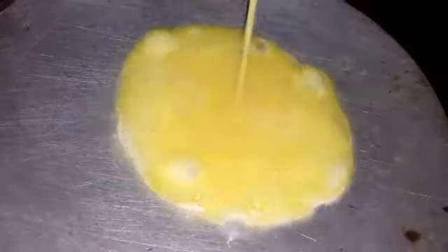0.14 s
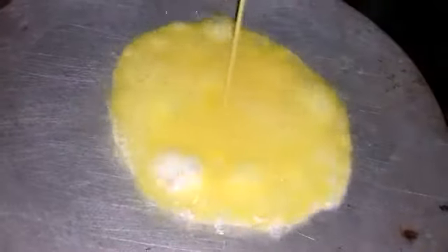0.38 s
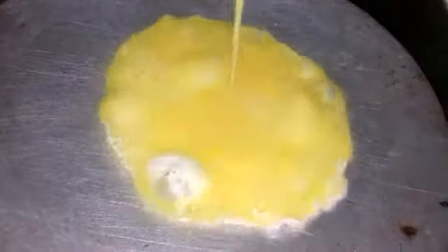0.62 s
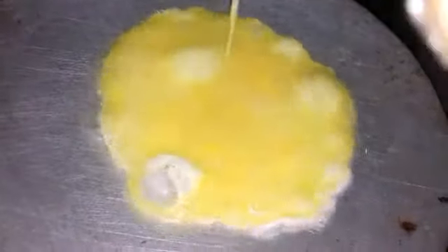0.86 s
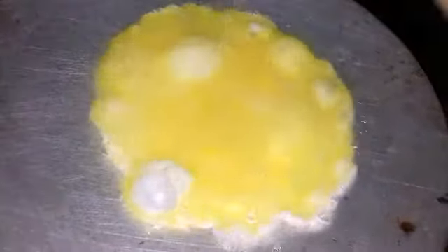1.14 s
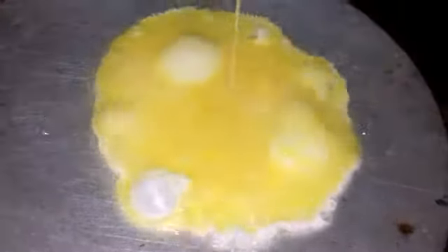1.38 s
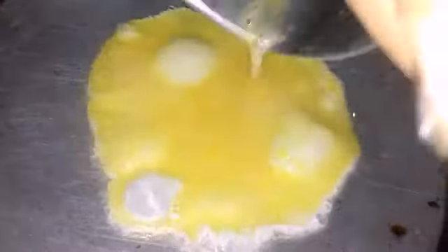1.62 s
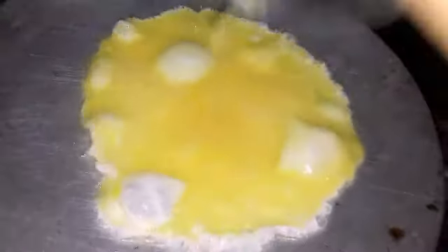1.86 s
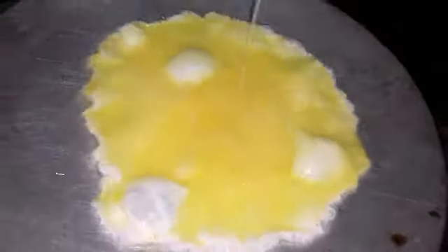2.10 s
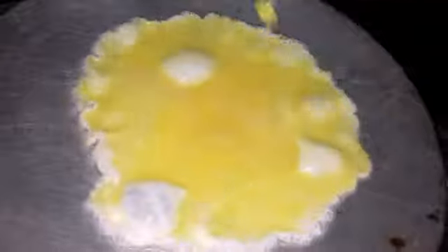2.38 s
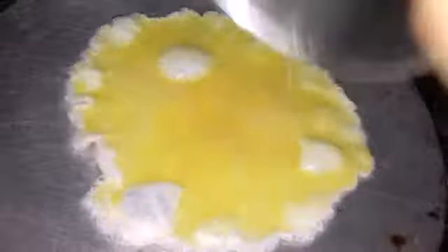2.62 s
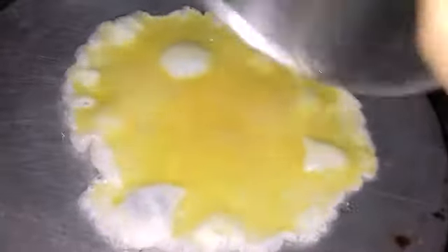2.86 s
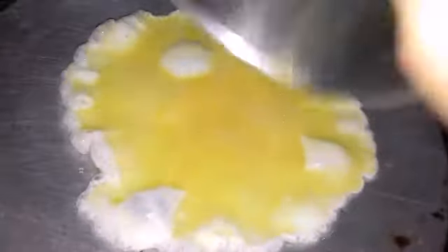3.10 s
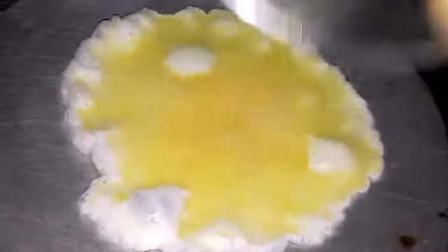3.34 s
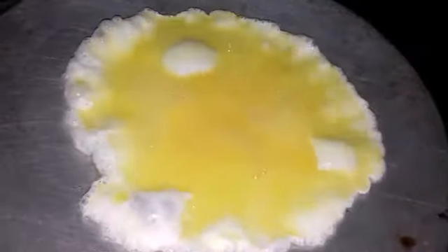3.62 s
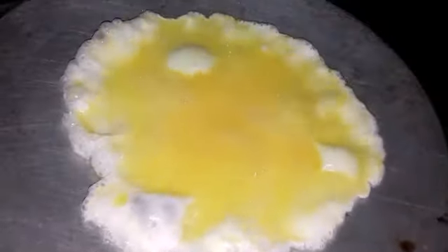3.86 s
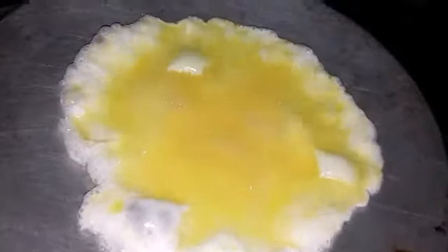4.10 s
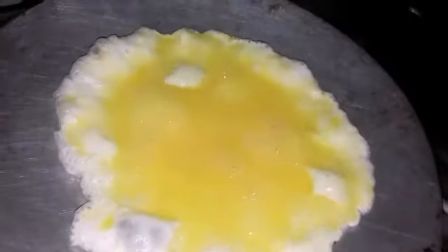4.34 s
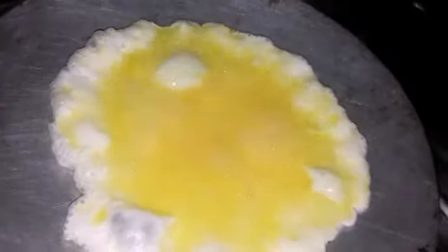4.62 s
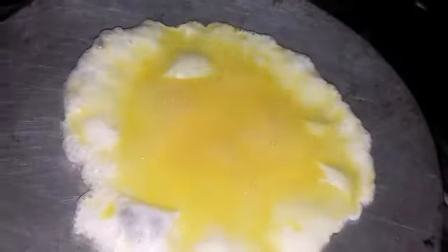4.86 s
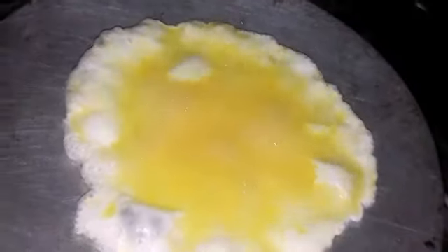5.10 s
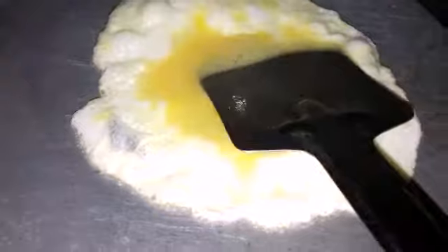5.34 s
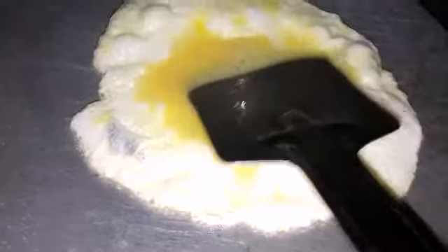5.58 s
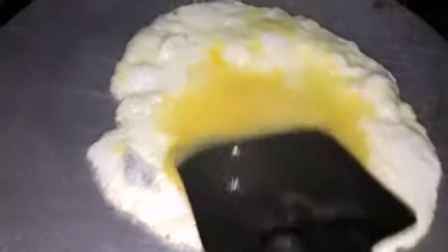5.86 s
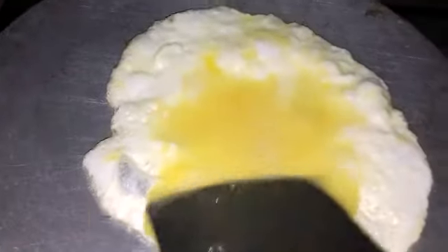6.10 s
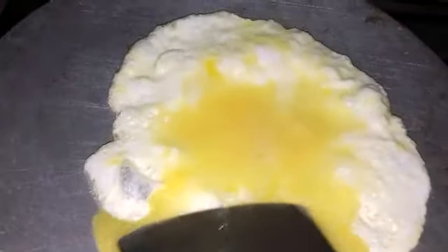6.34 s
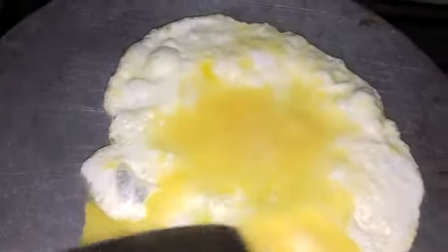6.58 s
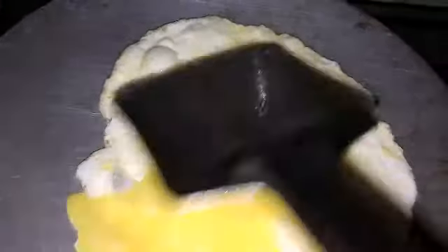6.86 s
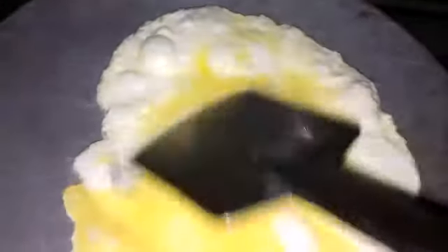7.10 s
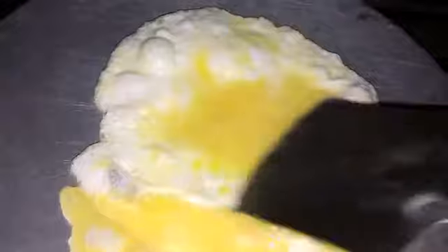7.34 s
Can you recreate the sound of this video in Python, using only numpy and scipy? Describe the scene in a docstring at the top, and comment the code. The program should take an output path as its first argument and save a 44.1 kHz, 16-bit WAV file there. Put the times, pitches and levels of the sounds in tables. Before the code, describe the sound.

Beaten egg sizzles and spits sharply on a hot metal griddle, dies to a faint crackle, then flares brightly as a spatula spreads it.

```python
"""Egg frying on a hot griddle

Beaten egg fries close by on hot oiled metal, with its fizz strongest at 3.5-5 kHz.
Steam bursts are dense random clicks, bubbles are short sines, and fat spits are rings with snaps and puffs.
The sizzle dies down, then flares at about 6 s when a spatula spreads raw egg on bare metal.
Dull knocks and tings come now and then. Filtered noise makes a faint kitchen hum, and a faint
noise that is opposite in the two channels and partly follows the fizz level.
"""
import sys
import numpy as np
from scipy import signal
from scipy.io import wavfile
from scipy.ndimage import uniform_filter1d

SR = 44100
rng = np.random.default_rng(int(sys.argv[2]) if len(sys.argv) > 2 else 0)


def wav_record(signal):
    """Record a signal, one row per channel, as 16-bit PCM in the file named by sys.argv[1]."""
    frames = np.transpose(np.atleast_2d(signal))
    bounded = np.clip(frames, -1, 1)
    # unit amplitude maps onto the largest positive 16-bit level
    quanta = np.round(bounded * 32767).astype(np.int16)
    wavfile.write(sys.argv[1], SR, quanta)


def boost(x):
    """Linear amplitude factor 10**(x/20) for a level x in decibels (scalar or array-like)."""
    u = np.asarray(x, float) / 20
    return 10 ** u


N = 328920  # length in samples


def evened(x):
    """Scales a sound to an rms of 1."""
    return x / np.sqrt(np.mean(x ** 2) + 1e-20)


def averaged_twice(x, size):
    """Smooths with two running means of size samples, leaving only slow changes."""
    return uniform_filter1d(uniform_filter1d(x, size), size)


def between(span, share):
    """Picks a value inside a range; share runs from 0 to 1."""
    return span[0] + (span[1] - span[0]) * share


def level(curve, column=1):
    """Draws straight lines between the points of a curve, one value per sample."""
    rows = np.array(curve)
    return np.interp(np.arange(N) / SR, rows[:, 0], rows[:, column])


def read(points, hz):
    """Reads a spectrum along a logarithmic frequency axis."""
    f, value = np.transpose(points)
    return np.interp(np.log(hz + 1), np.log(f + 1), value)


def causal(points, size=1024):
    """Turns a spectrum into its minimum-phase click, with the energy as early as possible."""
    hz = abs(np.fft.fftfreq(8 * size, 1 / SR))
    log_gain = np.log(boost(np.maximum(read(points, hz), -100)))
    return np.fft.ifft(np.exp(np.conj(signal.hilbert(log_gain)))).real[:size]


def band(x, low_hz, high_hz, order=2):
    """Keeps the frequencies between two limits with a Butterworth band-pass."""
    return signal.sosfilt(signal.butter(order, [low_hz, high_hz], "bandpass", fs=SR, output="sos"), x)


def add(mix, s, sound):
    """Mixes a sound in at s seconds."""
    part = mix[round(s * SR):][:len(sound)]
    part += sound[:len(part)]


def patchy_noise(points, patchy_db):
    """Noise of a given spectrum whose level drifts in patches of time and frequency."""
    a, b, patches = rng.standard_normal((N // 256 + 5, 513, 3)).T
    patches = uniform_filter1d(patches, size=10, axis=0)
    patches = evened(uniform_filter1d(patches, size=10, axis=1))
    colour_db = read(points, np.fft.rfftfreq(1024, 1 / SR))[:, None]
    z = (a + 1j * b) * boost(colour_db + patchy_db * patches)
    return evened(signal.istft(z, nperseg=1024, noverlap=768)[1][:N])


def clicks(per_s, spread_db, clump_db):
    """Random clicks, a few of them large, in clumps some 20 ms long."""
    happens = rng.random(N) < per_s / SR
    size = np.minimum(rng.exponential(1, N), 4.5)
    sign = rng.choice([-1., 1.], N)
    clump = evened(uniform_filter1d(rng.standard_normal(N), size=800))
    return sign * happens * boost(spread_db * size + clump_db * clump)


def ring(hz, cycles, rise=0.):
    """A sine that swells in under a cycle, then dies by 1/e in so many cycles while its pitch may rise."""
    turns = np.arange(round(6 * cycles * SR / hz)) * hz / SR
    envelope = (1 - np.exp(-turns / 0.19)) * np.exp(-turns / cycles)
    return envelope * np.sin(2 * np.pi * turns * (1 + rise * turns))


def whistle(t, db, hz, size):
    """A fuzzy tone: slow noise, averaged over size samples, riding on a pitch."""
    a = averaged_twice(rng.standard_normal(len(t)), size)
    b = averaged_twice(rng.standard_normal(len(t)), size)
    carrier = np.exp(2j * np.pi * np.cumsum(hz + 0 * t) / SR)
    return boost(db) * evened(((a + 1j * b) * carrier).real)


# colour of the kitchen hum: hz, level_db (per Hz)
HUM_COLOUR = [(15, -35), (30, 2), (60, -13.5), (80, -5.5), (100, 4.5), (150, 1.5), (190, -7.5), (221, 5),
              (290, -6), (351, 4.5), (430, -1.5), (700, -4), (1400, -32), (4250, -12), (5700, -39),
              (9500, -38), (13000, -49), (16000, -56)]


def hum():
    """Faint kitchen hum: noise that is strongest in the lows."""
    return boost(-59.5) * patchy_noise(HUM_COLOUR, 1.4)


# brief changes of the fizz, each fading back:
# start_s, rise_db (nominal; below 0 is a dip), t60_s (time for the change to fade by 60 dB)
FIZZ_SURGES = [(.245, -11, 0.4), (.32, -3.5, 0.28), (.975, 3, 0.39), (1.325, 3.5, 0.18), (1.57, -1, 0.24),
               (2.005, 0, .4), (2.22, 5.5, 0.69), (2.345, 2, 0.49), (2.54, 2.5, 1), (2.72, 2.5, 0.98),
               (3.405, 7, 0.47), (3.74, 5, 0.17), (3.89, 6.5, 0.38), (4.896, 11, 0.23), (5.15, 9, 0.98),
               (5.397, 12.5, 0.37), (5.667, 14, .4)]


def surge_db():
    """Gain of the fizz as it surges or dips briefly and settles back."""
    surplus, t = np.zeros(N), np.arange(SR) / SR
    for s, db, t60 in FIZZ_SURGES:
        onset = 1 - np.exp(-t / 0.0056)
        add(surplus, s, (boost(db) - 1) * onset * boost(-60 * t / t60))
    return 20 * np.log10(np.maximum(1 + surplus, .1))


# how hard the egg fries, before the surges and the plate: time_s, fizz_db, bubbles_db
FRYING = [(0, -35, -39.5), (.31, -31, -41.5), (.46, -39.5, -40.5), (1.04, -43, -41), (1.5, -40, -41),
          (2.1, -41.5, -43), (2.8, -43.5, -46), (3.3, -45, -46.5), (3.7, -50, -49.5), (4.0, -47.5, -48),
          (4.7, -53.5, -49.5), (5.1, -50, -51.5), (5.3, -56, -54), (5.34, -61.5, -59), (5.65, -66, -61.5),
          (5.995, -60.5, -56), (6.022, -42.5, -48), (6.05, -43, -50), (6.09, -37, -42.5), (6.13, -36, -42),
          (6.175, -38.5, -43), (6.215, -35.5, -43.5), (6.29, -35.5, -45.5), (6.36, -39, -46),
          (6.4, -38.5, -47), (6.5, -35, -44), (6.57, -39, -47.5), (6.6, -38.5, -45.5), (6.79, -47.5, -49.5),
          (6.85, -42, -48.5), (6.95, -42.5, -50.5), (7.02, -52, -48.5), (7.05, -52, -52.5),
          (7.15, -54.5, -49.5), (7.46, -52, -53)]


def fizz_level():
    """Level of the steam fizz over time in dB, with its surges."""
    return level(FRYING) + surge_db()


def bubble_level():
    """Level of the bubbling over time in dB, from which each kind of bubble is set."""
    return level(FRYING, column=2)


# colour of the faint noise that is opposite in the two channels: hz, level_db (per Hz)
OPPOSITE_COLOUR = [(15, -36), (25, -3), (476, 1), (754, 0), (962, 0), (2840, -2.5), (5000, -3), (9840, -4),
                   (12000, -3), (14400, -5), (16000, -23)]


def opposite_noise():
    """Faint patchy noise that follows 0.32 of the fizz swing: -61 dB when the fizz is at -44.5 dB."""
    return boost(-61 + 0.32 * (fizz_level() + 44.5)) * patchy_noise(OPPOSITE_COLOUR, 2.1)


def kitchen(x):
    """Adds a thin echo off the nearest wall and a short sparse tail of random reflections."""
    taps = np.zeros(8000)
    at = np.arange(200, 7980, 20) + rng.integers(0, 20, 389)
    taps[at] = rng.choice([-1., 1.], len(at)) * boost(-60 * at / SR / 0.32)  # falls 60 dB in 0.32 s
    taps *= boost(-6.5) / np.linalg.norm(taps)
    taps[0] += 1  # the direct sound
    add(taps, .0103, boost(-6) * band(signal.unit_impulse(200), 3000, 7000))
    return signal.oaconvolve(x, taps)[:N]


# what the knocks ring with: pitch_hz, level_db
WORKTOP_MODES = [(130, -6.5), (221, -1), (320, -1), (380, -9.5), (570, -22)]
# dull knocks of the spatula and its handle:
# start_s, level_db, brightness_db_per_octave, t60_s (time for the ring to fall 60 dB)
SPATULA_KNOCKS = [(4.905, -26.5, 2, 0.067), (4.917, -40.5, -9, 0.19), (5.033, -41.5, 11, 0.08),
                  (5.05, -59, 19, 0.083), (5.713, -47.5, -11.5, 0.099), (5.849, -50, -8, 0.089),
                  (6.002, -46, 10, 0.086), (6.018, -43.5, 15, 0.092), (6.035, -54, 10, 0.23),
                  (6.06, -48, 9, .12), (6.094, -46, -8, 0.11), (6.133, -47, 18, 0.1),
                  (6.343, -40, 4, 0.094), (6.71, -44, -4, 0.082), (7.071, -39, -2, 0.067)]


def knocks():
    """Low thumps: a soft push into damped modes, with a rough low rub."""
    out, t = np.zeros(N), np.arange(SR // 2) / SR
    for s, db, tilt_db, t60 in SPATULA_KNOCKS:
        modes = np.zeros(len(t))
        for hz, mode_db in WORKTOP_MODES:
            octaves = np.log2(hz / WORKTOP_MODES[1][0])
            modes += boost(mode_db + tilt_db * octaves) * np.sin(2 * np.pi * hz * t)
        rub = evened(band(rng.standard_normal(len(t)), 160, 700))
        rub *= boost(-13 + 30 * t / t60)  # so that it dies half as fast as the modes
        push = 1 - np.exp(-t / 0.0025)
        add(out, s, boost(db - 60 * t / t60) * push * (modes + rub))
    return band(out, 93, 570)  # a heavy top passes neither deep bass nor clatter


# the two modes of a ting: pitch_hz, t60_s (time to fall 60 dB)
TING_TONES = [(4760, 0.045), (3570, 0.057)]
# tings of the plate; the one at 5.679 s is an echo of the one before:
# start_s, level_db, low_mode_db (re the high one)
PLATE_TINGS = [(0.2412, -18.5, -23), (0.8894, -26, -5), (4.918, -31.5, -15), (5.6676, -39, 3.5),
               (5.679, -44, -8), (5.856, -41, -13)]


def tings():
    """Two plate modes that flutter a little as they die."""
    out, t = np.zeros(N), np.arange(4000) / SR
    for s, db, low_db in PLATE_TINGS:
        for (hz, t60), mode_db in zip(TING_TONES, (db, db + low_db)):
            tone = np.sin(2 * np.pi * hz * t) + whistle(t, -11, hz, size=120)
            add(out, s, boost(mode_db - 60 * t / t60) * (1 - np.exp(-t / .001)) * tone)
    return out


# two high singing tones: pitch_hz, level_db (re the fizz), fade_db_per_s (as the egg sets), swell_db
SINGING_TONES = [(4793, -5, -0.93, 2), (6050, -20, -.5, 4.5)]


def singing():
    """Narrow tones that follow the fizz level, swelling and sinking at random."""
    t, fizz_db, out = np.arange(N) / SR, fizz_level(), np.zeros(N)
    for hz, db, fade_db, swell_db in SINGING_TONES:
        swell = evened(averaged_twice(rng.standard_normal(N), size=1500))
        out += whistle(t, fizz_db + db + fade_db * t + swell_db * swell, hz, size=400)
    return out


# bright flares of the fizz: middle_s, level_db, half_length_s
BRIGHT_FLARES = [(6.21, -55, 0.059), (6.398, -49, 0.058), (6.504, -42, 0.046), (6.583, -47, 0.044),
                 (6.875, -46, 0.052)]


def flares():
    """Finer steam bursts, clicks kept to 3.6-9 kHz, in short bright flares."""
    fine, shape = evened(band(clicks(5000, 1.5, 1.5), 3600, 9000)), np.zeros(N)
    for s, db, half_length in BRIGHT_FLARES:
        add(shape, s - half_length, boost(db) * np.hanning(round(2 * half_length * SR)))
    return fine * shape


def ticks():
    """Tiny dry crackles, a cycle or two long: clicks in a low and a high band, 150 a second in each."""
    low = evened(band(clicks(150, 2.1, 1), 1600, 4140, order=3))
    high = evened(band(clicks(150, 2.1, 1), 3000, 5160, order=3))
    return boost(bubble_level() - 6) * (low + high)


# broken steam whistle: start_s, end_s, level_db, pitch_hz
STEAM_WHISTLES = [(1.13, 1.213, -50, 1730), (1.223, 1.281, -42.5, 1750), (1.321, 1.41, -45, 1720),
                  (1.405, 1.477, -45.5, 1770)]


def vent():
    """A steam whistle through a vent at the rim: a fuzzy tone, breaking up and wavering."""
    out = np.zeros(N)
    for start, end, db, hz in STEAM_WHISTLES:
        t = np.arange(start, end, 1 / SR)
        add(out, start, whistle(t, db, hz, size=170) * signal.windows.tukey(len(t), .5))
    return out


# steam seething out from under the blade: middle_s, level_db, half_length_s, pitch_hz, width_hz
BLADE_JETS = [(6.05, -41, .04, 3680, 900), (6.129, -33, .03, 4000, 1300), (6.15, -36, 0.016, 3540, 700),
              (6.215, -33, 0.038, 4530, 1200), (6.26, -35.5, 0.039, 3800, 1200),
              (6.33, -41, .03, 4370, 900), (6.4, -33.5, 0.038, 3500, 900), (6.45, -37.5, 0.042, 3930, 900),
              (6.5, -38, 0.032, 4370, 900), (6.6, -43, .03, 4270, 800)]


def jets():
    """Each steam jet is noise in a band of its own, swelling and sinking."""
    out = np.zeros(N)
    for s, db, half_length, hz, width in BLADE_JETS:
        shape = np.hanning(round(2 * half_length * SR))
        noise = evened(band(rng.standard_normal(len(shape)), hz - width / 2, hz + width / 2))
        add(out, s - half_length, boost(db) * shape * noise)
    return out


# the clearest plops of larger bubbles: start_s, level_db, pitch_hz
CLEAR_PLOPS = [(0.0293, -22.5, 1130), (0.2923, -27, 2760), (0.3506, -15, 2360), (0.4777, -23, 745),
               (0.5694, -23, 2140), (0.889, -16, 2270), (0.916, -25, 950), (1.149, -25, 924),
               (1.2629, -19.5, 1710), (1.3325, -21, 1300), (1.5524, -22, 2300), (1.6481, -32, 600),
               (1.888, -17, 2290), (1.9012, -18.5, 2230), (2.1385, -24.5, 1350), (2.1393, -28.5, 694),
               (1.7199, -29, 610), (2.2532, -25, 2170), (2.4235, -21.5, 1750), (2.5107, -19.5, 2300),
               (2.8072, -20.5, 2320), (2.8192, -14.5, 2300), (3.0515, -22.5, 2580), (3.098, -23, 2240),
               (3.1476, -25, 2960), (3.3724, -25, 2470), (3.4359, -32, 806), (3.798, -30, 1780),
               (3.8395, -28, 1110), (4.0447, -27.5, 795), (4.0636, -26, 1000), (4.1958, -25.5, 2420),
               (4.448, -33.5, 640), (4.4814, -27, 2590), (4.492, -31, 3040), (5.1193, -30, 2540),
               (5.4415, -42, 750), (5.5714, -37, 760), (5.6867, -39.5, 865), (5.7078, -41, 1530),
               (5.762, -34.5, 1870), (5.9956, -34.5, 980), (6.496, -19, 3000), (6.8004, -42, 2000),
               (6.9423, -37, 625), (7.0115, -37, 1610), (7.0784, -34.5, 980), (7.3398, -42, 1020)]


def plops(count=45):
    """Larger bubbles burst with a pitch of their own; lesser ones come at random."""
    out, (moment, pitch) = np.zeros(N), rng.random((count, 2)).T
    at = (moment * (N - 1)).astype(int)
    small_hz = np.exp(between(np.log((600, 2800)), pitch))
    small = list(zip(at / SR, bubble_level()[at] + 8, small_hz))
    for s, db, hz in list(CLEAR_PLOPS) + small:
        cycles = max(1.56 + 0.055 * np.log2(hz / 1000), 1)  # cycles to die by 1/e
        add(out, s, boost(db) * ring(hz, cycles, 0.00067))
    return out


def small_spits(count):
    """Lesser spits at random moments, riding on the fizz; levels in dB."""
    moment, size, snap, body, puff = rng.random((count, 5)).T
    at = (moment * (N - 1)).astype(int)
    spit_db = level(FRYING)[at] + between((3, 11), size)
    # snap, body and puff are relative to the spit
    return list(zip(at / SR, spit_db, between((-26, 5), snap), between((-14, 1), body),
                    between((-24, -9), puff)))


RING_CYCLES, RING_CYCLES_PER_DB = 0.84, 0.74  # a spit with a weaker snap rings longer and softer
CRACK_DB, CRACK_CYCLES_PER_DB = -17, .5  # spits above this level crack shorter
CRACK_CYCLES, LONGEST_CYCLES = .7, 6  # shortest crack and longest ring, in cycles


def spit_cycles(db, snap_db):
    """Cycles in which the ring of a spit dies by 1/e."""
    cycles = RING_CYCLES + RING_CYCLES_PER_DB * max(-snap_db, 0)
    shorter = cycles - CRACK_CYCLES_PER_DB * max(db - CRACK_DB, 0)
    return min(max(shorter, min(cycles, CRACK_CYCLES)), LONGEST_CYCLES)


# colour of a tiny steam burst, shared by the spits' puffs and the sizzle: hz, level_db (per Hz)
FIZZ_COLOUR = [(300, -52), (600, -15), (1800, -19), (2600, -8), (3300, -4), (3550, -0.5), (4750, -0.5),
               (5050, -6), (5500, -13), (6300, -16.5), (6600, -18.5), (10000, -22.5), (13000, -22),
               (15500, -14.5), (16200, -128)]
# the loudest spits, and three of their sharp echoes (at 2.0178 and 2.2298 s, about 10 ms after their spits, #
# and at 4.901 s, 5 ms after the spit at 4.896 s), # before the plate: start_s, level_db, then relative to that
# level # snap_db (treble) and body_db (middle), both before a 3 dB cut, and puff_db (fizz afterwards)
SPITS_AND_ECHOES = [(0.073, -27, -19, -15, -20), (0.1056, -29, -23, -14, 2), (0.156, -28, -22, -15, -22),
                    (0.222, -32.5, -21, -15, -28), (0.2406, -17, -26, -25, -21),
                    (0.297, -16, -25, -15, -14), (0.3197, -18.5, -31, -26, -9),
                    (0.3315, -12, -25, -15, -21), (0.8414, -16.5, -23, -12, -13),
                    (0.9727, -5, -6.5, -12, -18.5), (0.9949, -18, -13, -10, -14.5), (1.132, -26, -4, 4, -2),
                    (1.324, -16, -10, -21, -11.5), (1.3744, -35, 12.5, -5, -14),
                    (1.4495, -18.5, -3, -10, -16), (1.7551, -25, -10, -14, -10),
                    (2.0062, -13.5, -21, -0.5, -12), (2.0178, -19, -26, -15, -26),
                    (2.179, -19.5, -2, -27, -45), (2.219, -5.5, -9, -8.5, -17),
                    (2.2298, -20, -20, -20, -19), (2.3433, -14, -5, -6, -12),
                    (2.381, -12.5, -10, -7, -14.5), (2.4375, -20.5, -5, -8, -15.5),
                    (2.5419, -15, -18, -10, -21), (2.5787, -27, 5, -11, -22), (2.7186, -15.5, -5, -6, -18),
                    (2.7924, -24, -22, -14, -7), (2.8193, -23.5, -24, -8, -8), (3.082, -16, -9, -25, -19),
                    (3.2905, -27.5, -16, 4, -28), (3.151, -29.5, -10, 3.5, -6),
                    (3.406, -17.5, -17, -4.5, -33), (3.4886, -17, -2, -23, -27),
                    (3.5207, -26, -8, 5, -12.5), (3.5553, -26.5, -7, -6, -13), (3.7315, -26.5, -20, 0, -8),
                    (3.753, -22.5, -3, -4, -14.5), (3.8847, -21, -10, -11, -15.5),
                    (3.9203, -25.5, 3, -16, -20), (4.0614, -32, -7, 9, -11), (4.1225, -28, -14, -14, -27),
                    (4.1959, -28, -10, -11, -7), (4.3038, -24, 0.5, -18, -30.5),
                    (4.359, -25.5, -10, 1, -19), (4.425, -35.5, 14, -8, -36), (4.514, -39, -12, 11, -18),
                    (4.6382, -20, -13.5, -11, -32), (4.6903, -20, -20, -5, -26),
                    (4.7926, -32.5, -6, 0, -13), (4.896, -13.5, -14, -24, -20),
                    (4.901, -32, -22, -26, -27.5), (4.931, -23.5, -25, -18, -11.5),
                    (5.014, -36, -12, -2, -25), (5.065, -38, -15, 3, -25), (5.0924, -32.5, -17, -13, -20),
                    (5.1526, -26.5, -8, 1.5, -6), (5.1624, -24.5, -9, 1, -16), (5.2495, -30, -3, 2, -14),
                    (5.3122, -27, -23, -9.5, -26), (5.3353, -31, -2, -7, -37), (5.376, -41, -9, -2.5, -24),
                    (5.3974, -26.5, 3.5, -20, -18.5), (5.4953, -35, -21, 5, -15),
                    (5.5736, -39.5, -10, 10, -7.5), (5.6676, -31, -23, -1, -13),
                    (5.7086, -32.5, -23, 5.5, -22), (5.7893, -37, -11, -9, -23),
                    (5.857, -39, -18, -14, -11), (5.9142, -35.5, -34, 2.5, -14),
                    (5.9674, -37.5, -13, 2, -18), (6.0605, -19, -20, -18, -23),
                    (6.1135, -16, -18, -23, -30), (6.1175, -24, -18, -25, -29),
                    (6.1252, -23, -23, -28, -29), (6.149, -21, -20, -18, -9), (6.2198, -18, -19, -28, -16),
                    (6.246, -21, -22, -20, -19), (6.256, -27, -1, -20, -20), (6.277, -20, -20, -20, -24),
                    (6.384, -26, -18, -20, -14), (6.593, -26.5, 3, -25, -14),
                    (6.8005, -26.5, -15, 4.5, -27), (6.898, -29, -15, -16, -20),
                    (6.9815, -26.5, -10, 7, -8), (7.018, -32, 8.5, -4, -33), (7.1424, -30, 1, -8, -24),
                    (7.1957, -26.5, -25, -15, -7.5), (7.2297, -28.5, 1, 1, -31),
                    (7.3402, -27, -27, 5.5, -23), (7.3784, -33, -20, 5, -14), (7.4052, -30.5, -26, 3, -12)]


def spits():
    """Each spit of fat: a short ring, a sharp snap, a duller body, then a puff of fizz and spray."""
    out, colour, t = np.zeros(N), causal(FIZZ_COLOUR), np.arange(3000) / SR
    snap = band(signal.unit_impulse(80), 7500, 19845)
    body = band(signal.unit_impulse(300), 1390, 4340)
    snap, body = snap / abs(snap).max(), body / abs(body).max()
    fade_out = signal.windows.tukey(6000, .3)[3000:]
    for s, db, snap_db, body_db, puff_db in list(SPITS_AND_ECHOES) + small_spits(count=35):
        hz, cycles = between((3620, 4490), rng.random()), spit_cycles(db, snap_db)
        add(out, s, boost(db) * np.sqrt(RING_CYCLES / cycles) * ring(hz, cycles, 0.0019))
        add(out, s, boost(db + snap_db - 3.0) * snap)
        add(out, s, boost(db + body_db - 3.0) * body)
        noise, flicker = rng.standard_normal((2, 3000))
        flicker = np.clip(evened(uniform_filter1d(flicker, size=40)), -3, 1.5)
        crackly = noise * boost(5.9 * flicker) * (1 - np.exp(-t / 0.00019))
        decay = boost(-60 * t / 0.023) + boost(-18.5 - 60 * t / 0.56)  # a quick fall, then a slow one
        puff = evened(signal.oaconvolve(crackly, colour)[:3000]) * decay * fade_out
        spray = evened(signal.oaconvolve(crackly, snap)[:3000]) * boost(snap_db + 4.5 - 60 * t / 0.037)
        add(out, s, boost(db + puff_db) * (puff + spray))
    return out


def bubbles(low_hz, high_hz, per_s, cycles, spread_db, count=8):
    """Bubbles of many sizes, each size bursting on its own as a short sine of rising pitch."""
    out = np.zeros(N)
    for hz in np.geomspace(low_hz, high_hz, count):
        bubble = evened(ring(hz, cycles, 0.0096)) * np.sqrt(hz)
        out += signal.oaconvolve(clicks(per_s / count, spread_db, 0.7), bubble)[:N]
    return evened(out)


# low bubbling under the liquid egg: time_s, level_db
LOW_BUBBLING = [(0, -49.5), (.5, -49), (1.8, -49), (3.55, -53.5), (3.72, -61), (4.11, -56.5), (5.09, -62.5),
                (5.17, -51.5), (5.3, -60), (5.35, -88), (5.94, -70.5), (6.05, -54), (6.3, -57),
                (6.5, -58.5), (7.46, -61)]
# fine treble spray, before a 1.5 dB cut and the plate: time_s, level_db
FINE_SPRAY = [(0.0, -78.5), (0.18, -59), (0.29, -48), (1.06, -46), (1.24, -45), (1.54, -50.5),
              (2.53, -46.5), (3.76, -54), (4.09, -55), (4.63, -58), (4.88, -60), (5.05, -58), (5.25, -52.5),
              (5.4, -65), (5.77, -68), (6.07, -61), (6.21, -44), (6.27, -48.5), (6.42, -45.5), (6.86, -48),
              (7.04, -53.5), (7.46, -78)]


def sizzle():
    """Dense steam bursts, bubbles of three sizes under and around the egg, and fine spray."""
    t, bubbles_db, burst = np.arange(N) / SR, bubble_level(), causal(FIZZ_COLOUR)
    bursts = evened(signal.oaconvolve(clicks(1700, 1.9, 1.1), burst)[:N])
    fizz = boost(fizz_level() - 0.5) * (bursts + boost(-8) * patchy_noise(FIZZ_COLOUR, 2.1))
    low = boost(level(LOW_BUBBLING)) * bubbles(558, 762, 500, 2.8, 2.9, count=6)
    # as the egg sets, middling bubbles gain on the bubble level and small ones lose, in dB per s
    middling = boost(bubbles_db - 7.5 + 0.4 * t) * bubbles(910, 1630, 2000, 3.4, 4.35)
    small = boost(bubbles_db - 4.17 - 0.33 * t) * bubbles(1730, 3030, 3000, 5.3, 4.4)
    spray = band(signal.oaconvolve(clicks(3000, 0.6, 1.9), burst)[:N], 7000, 19845, order=4)
    return fizz + low + middling + small + boost(level(FINE_SPRAY) - 1.5) * evened(spray)


# what the griddle plate rings with: pitch_hz, width_hz, level_db
PLATE_MODES = [(580.4, 20, -4), (697, 53, -5.5), (924, 45, -3), (1110, 37, -9.5), (1404, 84, -13),
               (1710, 27, -4), (2210, 260, -7.5), (3554, 39, -5), (3800, 90, -4), (4100, 130, -8),
               (4293, 51, -0.5), (4476, 46, 1.5), (5250, 60, -8), (6270, 58, 1), (7480, 140, -7.5),
               (9040, 50, -4), (13200, 33, -8)]


def griddle(x):
    """The plate rings on at its modes; the small dry bursts carry no bass."""
    rung = np.zeros(N)
    for hz, width, db in PLATE_MODES:
        rung += boost(db) * signal.lfilter(*signal.iirpeak(hz, hz / width, SR), x)
    return band(x + rung, 382, 10500, order=3)


def scene():
    """One near source in the middle, and a faint noise that is opposite in the two channels."""
    frying = griddle(sizzle() + vent() + jets() + kitchen(spits() + plops()))
    touches = kitchen(knocks()) + tings()
    middle = frying + ticks() + flares() + singing() + touches + hum()
    opposite = opposite_noise()
    return np.array([middle + opposite, middle - opposite])


def band_limit(x):
    """A steep low-pass at the top of the band."""
    return signal.sosfilt(signal.butter(12, 16000, fs=SR, output="sos"), x)


def record(dry):
    """Adds the small steady offset of the microphone to the mix."""
    mix = dry - .0006
    return band_limit(mix)


dry = scene()
out = record(dry)
wav_record(out)
```